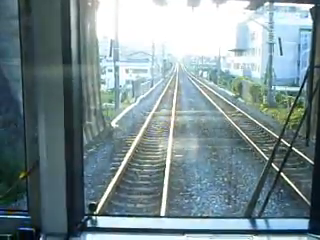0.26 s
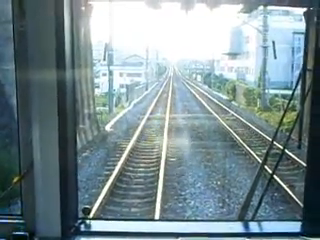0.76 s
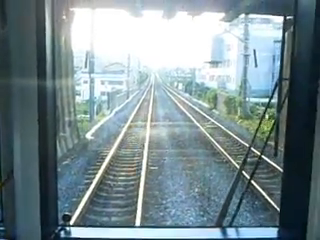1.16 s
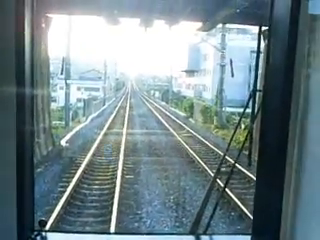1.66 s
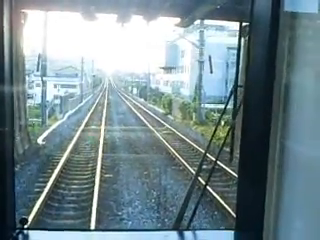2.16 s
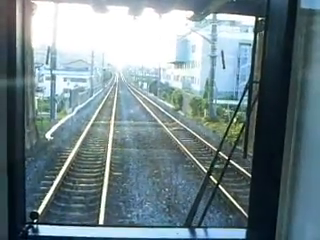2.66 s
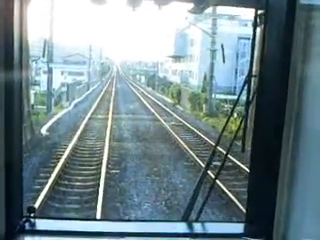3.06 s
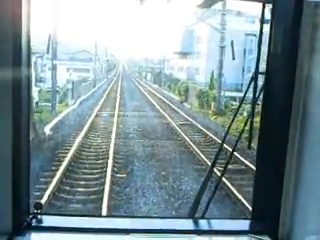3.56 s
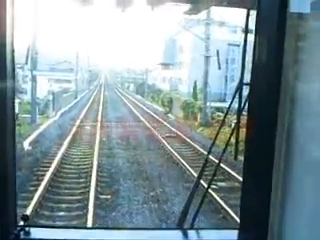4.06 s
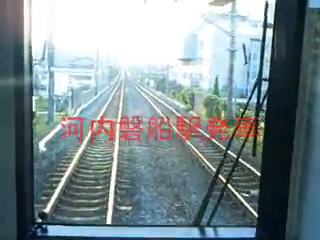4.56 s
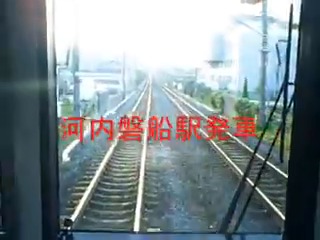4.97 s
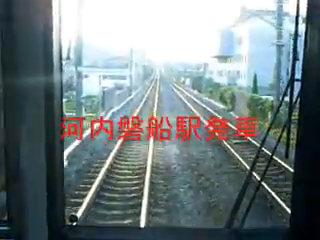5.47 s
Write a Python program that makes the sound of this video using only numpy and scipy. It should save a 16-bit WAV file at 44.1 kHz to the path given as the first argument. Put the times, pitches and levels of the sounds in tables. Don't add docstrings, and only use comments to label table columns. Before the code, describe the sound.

The inside of an electric train cab as it starts moving, dominated by bass. Throughout, a low compressor drone near 47 Hz, soft machinery hums and a thin steady converter tone near 547 Hz sit under faint vent air. At 0.1 s a thump opens a brake valve; its airy sigh fades quickly within about half a second. A short squeak at 0.6 s leads into the hardest booming knock at 0.8 s, with further heavy jolts near 0.95, 1.2 and 1.45 s, some distorting. Thin wavering squeaks run from about 1.4 to 2.5 s. The ride then becomes calmer but uneven, with soft shudders, slowly growing wheel rumble and a second motor hum from 2.5 s. Small ticks fall at 3.2, 3.3, 3.45 and 4.2 s, among faint rasps. A deep thud lands at 4.85 s, followed by quiet squeaks and rumble until the end. Muffled, slightly gritty small-camera sound.

```python
import sys
import numpy as np
from scipy import signal
from scipy.fft import rfft, irfft, next_fast_len
from scipy.io import wavfile
from scipy.ndimage import uniform_filter1d, map_coordinates

SR = 44100
rng = np.random.default_rng(int(sys.argv[2]) if len(sys.argv) > 2 else 0)


def decibels_to_gain(level_db):
    exponent = np.asarray(level_db, float) / 20
    return 10 ** exponent


def wav_out(sig):
    wavfile.write(sys.argv[1], SR, np.round(np.clip(np.atleast_2d(sig).T, -1, 1) * 32767).astype(np.int16))


N = 252693

# (frequency [Hz], bandwidth [Hz], rms level [dB])
AUXILIARY_HUMS = [(121.9, 3, -38.5), (176, 5, -40), (239.6, 4.4, -43.5), (298, 21, -55.5),
                  (360.8, 14.6, -47), (471, 10, -51.5), (664.6, 2.8, -52.5), (704, 16, -56.5)]
# (frequency [Hz], density [dB per Hz])
ROLLING_SPECTRUM = [(60, -6), (85, 1.5), (130, -8), (200, -11), (300, -13.5), (450, -24.5), (650, -26),
                    (900, -24.5), (1100, -37.5)]
# (frequency [Hz], density [dB per Hz])
VENT_SPECTRUM = [(900, 4), (1250, 3.5), (1550, 0), (1900, -8), (2300, -8.5), (2700, -5), (3300, -15),
                 (4500, -13), (5800, -15.5)]
# (frequency [Hz], density [dB per Hz])
SIGH_SPECTRUM = [(120, 10.5), (200, 6.5), (350, 1), (600, -5), (950, -1.5), (1280, 5.5), (1550, 0.5),
                 (1800, -7), (2000, -14), (2200, -14)]
# (frequency [Hz], density [dB per Hz])
BRIGHT_AIR_SPECTRUM = [(2150, -8), (2650, 5), (3300, -16), (3700, -2.5), (4400, -10.5), (5200, -3.5),
                       (6600, -21.5)]
# (time [s],
# peak level [dB], frequency [Hz], 60 dB decay time [s])
FRAME_JOLTS = [(0.106, 2.5, -47, 0.16), (0.11, -19, 178, 0.4), (0.78, -1.5, 59, 0.28),
               (0.79, -7.5, 77.5, 0.8), (0.86, -1, 17.5, 0.92), (1.1557, 0, 35, 0.7),
               (1.4312, -17, 274, 0.091), (1.435, -25.5, 422, 0.12), (2.954, -14, 36, 1),
               (3.402, -9.5, 33.5, 0.28), (4.839, -1.5, 12, 0.33), (4.829, -14.5, 91, 0.63),
               (1.72, -14, 79.5, 0.4), (5.619, -29, 275, 0.18), (1.45, -25.5, 570, 0.097)]
# (start [s], end [s], start pitch [Hz], end pitch [Hz], rms level [dB])
SEAL_SQUEAKS = [(0, 0.094, 1390, 1350, -49), (0.614, .73, 824, 830, -43), (.62, 0.734, 912, 843, -50),
                (1.382, 1.72, 1500, 1506, -61.5), (1.805, 2.007, 1498, 1463, -56),
                (1.971, 2.195, 1460, 1437, -52.5), (2.2, 2.275, 1372, 1450, -51.5),
                (0.726, 0.783, 788, 805, -48), (4.0, 4.116, 2730, 2750, -63),
                (5.568, 5.728, 2150, 2100, -85), (2.387, 2.527, 1460, 1430, -51.5),
                (3.872, 3.938, 639, 632, -44), (4.79, 4.91, 1460, 1470, -61),
                (4.932, 5.05, 1520, 1515, -56), (5.23, 5.354, 1467, 1470, -50),
                (5.364, 5.46, 1445, 1515, -55), (5.552, 5.656, 658, 634, -45)]
# (time [s], peak level [dB], frequency [Hz])
FITTING_TICKS = [
    (.11, -39, 1597),
    (0.116, -35.5, 1397),
    (1.2, -44, 1653),
    (2.6, -61, 2710),
    (3.191, -41.5, 1594),
    (3.27, -45.5, 1595),
    (3.456, -45.5, 1255),
    (4.173, -45, 1583),
]
# (time [s], height [full scale], half
# width [s])
FLOOR_HEAVES = [
    (0, -.13, .015),
    (.1295, .7, .007),
    (.8075, 1.5, .0045),
    (.9535, .95, .011),
    (1.184, -1.02, .010),
    (1.455, .5, .003),
    (4.86, .7, .011),
    (5.73, .01, .008),
]
# (start [s], end [s], rms level [dB])
RIGGING_RASPS = [
    (0.634, 0.732, -70),
    (1.204, 1.467, -64),
    (1.7, 1.789, -73),
    (2.538, 2.732, -63),
    (3.25, 3.552, -73),
    (4.12, 4.249, -65.5),
]
# (time [s], half width [s], shudder level [dB], boom level [dB])
SPRING_LURCHES = [(0.0, 0.044, -19.5, -10), (.155, .045, -13, -29), (.26, 0.062, -26, -16.5),
                  (0.621, 0.028, -13, -23), (0.821, 0.075, -16, 1.5), (.94, 0.037, -3, -11.5),
                  (1.042, 0.026, -21, -26), (1.15, 0.05, -10, -9.5), (1.319, 0.063, -13.5, -11.5),
                  (1.45, 0.09, -17.5, -7.5), (1.61, 0.045, -21.5, -15), (1.771, 0.092, -28, -5.5),
                  (1.93, .1, -21.5, -12), (2.129, 0.074, -21.5, -15), (2.301, 0.13, -17, -27),
                  (2.67, 0.078, -18, -20), (2.8, 0.031, -15.5, -22), (3.069, 0.11, -24.5, -11.5),
                  (3.408, .06, -12.5, -15), (3.49, .04, -17, -6.5), (3.63, 0.022, -11, -20.5),
                  (3.769, .06, -14, -10), (3.93, .07, -20.5, -29.5), (4.08, 0.071, -11.5, -13.5),
                  (4.4, 0.13, -24.5, -9.5), (4.72, 0.036, -22, -7), (4.862, 0.047, -10.5, -2),
                  (5.22, 0.22, -18, -14.5), (5.52, .08, -17.5, -17), (5.67, 0.026, -18, -6.5)]
# (time [s], first order level [dB])
COMPRESSOR_LOAD = [
    (0, -17.5),
    (.16, -14),
    (.5, -43),
    (.89, -16),
    (1.1, -22),
    (1.4, -17),
    (1.9, -18.5),
    (2.9, -25),
    (5.73, -31),
]

CALM_SHUDDER_DB, CALM_BOOM_DB = -21, -29.5
ROLLING_DB, ROLLING_GAIN_DB_PER_S, ROLLING_FROM_LURCH_DB = -36, 2, -14.5
SLACK_DB, SLACK_S, SLACK_HALF_S = -29.5, 0.98, 1.32
VENT_DB, VENT_FADE_DB_PER_S = -41, 0.7
TONE_HZ, TONE_DB, TONE_START_FLAT_HZ, TONE_SETTLE_S = 546.8, -33.5, 1.37, 0.063
TONE_SURGE_DB, TONE_SURGE_S, TONE_SURGE_HALF_S = 2, 0.55, 0.57
MOTOR_HZ = 47.44
SECOND_START_DB, SECOND_FULL_DB, SECOND_WAKES_S, SECOND_GAIN_DB_PER_S = -50, -31, 2.5, 1.8
SIGH_S, SIGH_LENGTH_S = 0.107, 0.69
SIGH_DB, SIGH_ATTACK_S, SIGH_FALL_DB_PER_S = -32.5, 0.0066, 61.5
SIGH_POP_DB, SIGH_POP_S = -4, 0.01
BRIGHT_AIR_DB, BRIGHT_AIR_LAG_S = 12.5, 0.033
TICK_RATTLE_DB, TICK_RATTLE_T60_S = 8, 0.12
CAMERA_RATE_HZ, SMOOTHING_SAMPLES = 12001, 11


def rms_one(x):
    return x / np.sqrt(np.mean(x ** 2) + 1e-20)


def bump(t, centre_s, half_s):
    return np.exp(-((t - centre_s) / half_s) ** 2)


def drift(rate_hz):
    pole = np.exp(-80 * np.pi * rate_hz / SR)
    white = rng.standard_normal(N // 40 + 2002)
    slow = signal.lfilter([1], [1, -2 * pole, pole * pole], white)[2000:]
    return np.interp(np.arange(N) / 40, np.arange(len(slow)), rms_one(slow))


def coloured(spectrum, patchy_db):
    size = next_fast_len(N)
    hz = np.maximum(np.fft.rfftfreq(size, 1 / SR), 1)
    point_hz, point_db = np.array(spectrum).T
    gain = decibels_to_gain(np.interp(np.log(hz), np.log(point_hz), point_db))
    inside = (hz > point_hz[0]) * (hz < point_hz[-1])
    bins = rfft(rng.standard_normal(size)) * gain * inside
    band = np.floor(2 * np.log2(hz))
    total = np.zeros(N)
    for k in np.unique(band[np.abs(bins) > 0]):
        total += irfft(bins * (band == k), size)[:N] * decibels_to_gain(patchy_db * drift(6.2))
    return rms_one(total)


def resonance(hz, width_hz):
    r = np.exp(-np.pi * width_hz / SR)
    poles = [1, -2 * r * np.cos(2 * np.pi * hz / SR), r * r]
    x = signal.lfilter([1, 0, -1], poles, rng.standard_normal(N + SR))
    return rms_one(signal.lfilter([1, 0, -1], poles, x)[SR:])


def sway(low_hz, high_hz, even_s):
    sos = signal.butter(2, [low_hz, high_hz], "band", fs=SR, output="sos")
    x = signal.sosfilt(sos, signal.sosfilt(sos, rng.standard_normal(N + SR)))[SR:]
    span = int(even_s * SR)
    power = uniform_filter1d(uniform_filter1d(x ** 2, span), span)
    return rms_one(x / np.sqrt(power))


def glide(hz, level_db):
    return np.sqrt(2) * decibels_to_gain(level_db) * np.sin(2 * np.pi * np.cumsum(hz) / SR)


def struck(s, peak_db, hz, t60, rise_s):
    t = np.maximum(np.arange(N) / SR - s, 0)
    return decibels_to_gain(peak_db - 60 * t / t60) * (1 - np.exp(-t / rise_s)) * np.sin(2 * np.pi * hz * t)


def vents():
    t = np.arange(N) / SR
    return decibels_to_gain(VENT_DB - VENT_FADE_DB_PER_S * t) * coloured(VENT_SPECTRUM, patchy_db=1.5)


def auxiliaries():
    return sum(decibels_to_gain(level_db) * resonance(hz, width_hz) for hz, width_hz, level_db in AUXILIARY_HUMS)


def converter():
    t = np.arange(N) / SR
    tone_hz = TONE_HZ - TONE_START_FLAT_HZ * np.exp(-t / TONE_SETTLE_S)
    surge_db = TONE_SURGE_DB * bump(t, TONE_SURGE_S, TONE_SURGE_HALF_S)
    return glide(tone_hz, TONE_DB + surge_db + 0.31 * drift(3.0))


def squeaks():
    t = np.arange(N) / SR
    out = np.zeros(N)
    waver_hz, waver_db = 10 * drift(22), 2.2 * drift(16)
    for start, end, start_hz, end_hz, level_db in SEAL_SQUEAKS:
        along = np.clip((t - start) / (end - start), 0, 1)
        envelope = np.sin(np.pi * along ** 0.78) ** 0.31
        pitch_hz = start_hz + (end_hz - start_hz) * along + waver_hz
        out += envelope * glide(pitch_hz, level_db + 5 + waver_db)
    return out


def ticks():
    t = np.arange(N) / SR
    out = np.zeros(N)
    rattle = coloured(VENT_SPECTRUM, patchy_db=3.0)
    for s, peak_db, hz in FITTING_TICKS:
        decay = decibels_to_gain(peak_db + TICK_RATTLE_DB - 60 * np.abs(t - s) / TICK_RATTLE_T60_S)
        out += np.clip((t - s) / 0.006, 0, 1) * decay * rattle
        out += struck(s, peak_db + 10.5, hz, 0.082, rise_s=0.003)
        out += struck(s, peak_db - 8, 0.79 * hz, 0.068, rise_s=0.0019)
    return out


def brake_valve():
    t = np.arange(N) / SR
    since = np.maximum(t - SIGH_S, 0)
    flow = (1 - np.exp(-since / SIGH_ATTACK_S)) * decibels_to_gain(SIGH_DB - SIGH_FALL_DB_PER_S * since)
    flow *= np.clip((SIGH_LENGTH_S - since) / 0.046, 0, 1)
    bright_air = coloured(BRIGHT_AIR_SPECTRUM, patchy_db=-1.5)
    pop = 1 + decibels_to_gain(SIGH_POP_DB) * np.exp(-since / SIGH_POP_S)
    sigh = pop * decibels_to_gain(19) * coloured(SIGH_SPECTRUM, patchy_db=1.0)
    sigh += (1 - np.exp(-since / BRIGHT_AIR_LAG_S)) * decibels_to_gain(BRIGHT_AIR_DB) * bright_air
    rubbing = np.zeros(N)
    for start, end, level_db in RIGGING_RASPS:
        along = np.clip((t - start) / (end - start), 0, 1)
        rubbing += decibels_to_gain(level_db + 17.5) * np.sin(np.pi * along) ** 0.26
    return flow * sigh + rubbing * bright_air


def compressor():
    t = np.arange(N) / SR
    load_s, load_db = np.transpose(COMPRESSOR_LOAD)
    first_db = np.interp(t, load_s, load_db)
    rolled_s = t - SECOND_WAKES_S
    second_db = SECOND_START_DB + (SECOND_FULL_DB - SECOND_START_DB) * np.clip(rolled_s / 0.15, 0, 1)
    second_db += SECOND_GAIN_DB_PER_S * np.maximum(rolled_s, 0)
    turning_hz = MOTOR_HZ + 0.5 * drift(2.37)
    first = glide(turning_hz, first_db - 0.5 + 0.91 * drift(5.8))
    return first + glide(2 * turning_hz, second_db + 1.2 * drift(9))


def lurching():
    t = np.arange(N) / SR
    levels = decibels_to_gain([[CALM_SHUDDER_DB], [CALM_BOOM_DB]])
    for s, half_s, shudder_db, boom_db in SPRING_LURCHES:
        levels = levels + bump(t, s, half_s) * decibels_to_gain([[shudder_db], [boom_db]])
    return levels


def wheels(shudder):
    t = np.arange(N) / SR
    level = decibels_to_gain(ROLLING_DB + ROLLING_GAIN_DB_PER_S * t) + decibels_to_gain(ROLLING_FROM_LURCH_DB) * shudder ** 2
    level += decibels_to_gain(SLACK_DB) * bump(t, SLACK_S, SLACK_HALF_S)
    return level * coloured(ROLLING_SPECTRUM, patchy_db=1.0)


def bottomed(motion):
    t = np.arange(N) / SR
    motion = 0.8 * np.tanh(motion / 0.8)
    for s, height, half_s in FLOOR_HEAVES:
        push = bump(t, s, half_s)
        motion = motion * (1 - np.sqrt(push)) + height * push
    return motion


def body():
    shudder, boom = lurching()
    deep = shudder * sway(7.17, 34.8, even_s=0.17)
    deep += boom * decibels_to_gain(-7.5) * sway(30, 67.2, even_s=0.038)
    deep += compressor()
    for s, peak_db, hz, t60 in FRAME_JOLTS:
        deep += struck(s, peak_db, hz, t60, rise_s=0.002)
    rolling = wheels(shudder)
    moved = bottomed(deep + 0.8 * rolling) + 0.2 * rolling
    return moved - np.mean(moved)


def scene():
    background = vents() + auxiliaries() + converter()
    return (background + squeaks() + ticks() + brake_valve() + body())[None]


def band_limit(x):
    return signal.sosfilt(signal.butter(12, 15900, fs=SR, output="sos"), x)


def record(dry):
    step = SR / CAMERA_RATE_HZ
    instants = np.arange(int(N / step) + 1) * step
    sampled = map_coordinates(dry[0], [instants], order=3, mode="nearest")
    smooth = uniform_filter1d(sampled, size=SMOOTHING_SAMPLES)
    smooth += decibels_to_gain(-75.5) * rng.standard_normal(len(smooth))
    held = np.clip(smooth, -1, 1)[(np.arange(N) / step).astype(int)]
    return band_limit(held[None])


dry = scene()
out = record(dry)
wav_out(out)
```